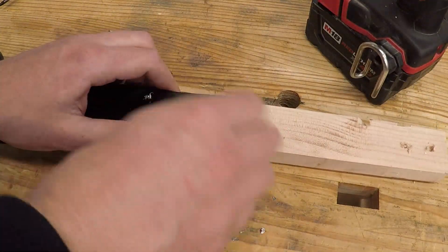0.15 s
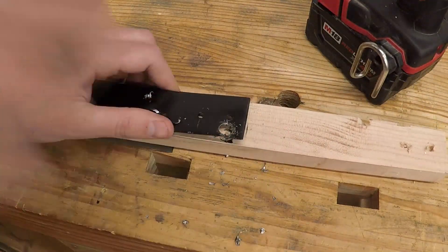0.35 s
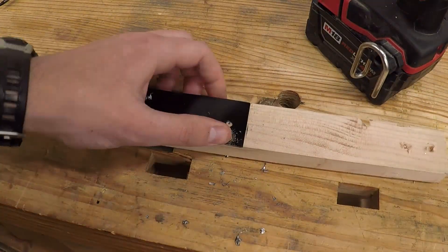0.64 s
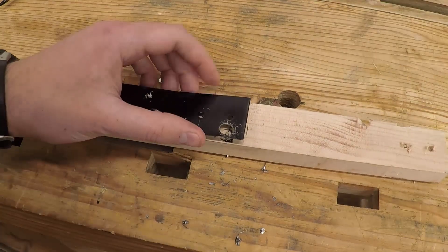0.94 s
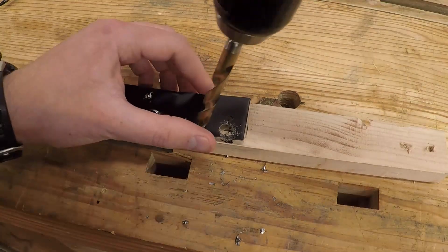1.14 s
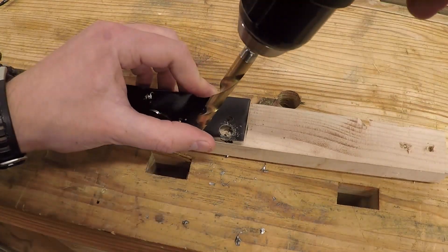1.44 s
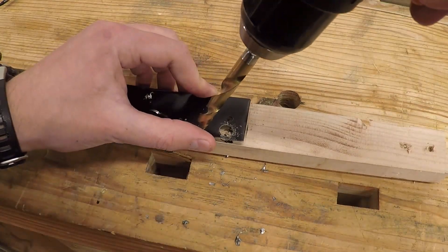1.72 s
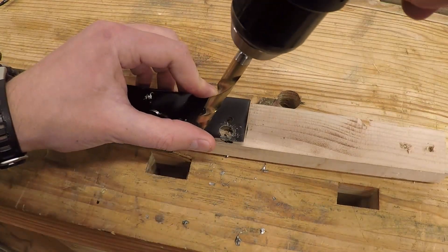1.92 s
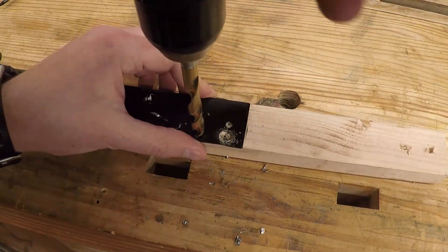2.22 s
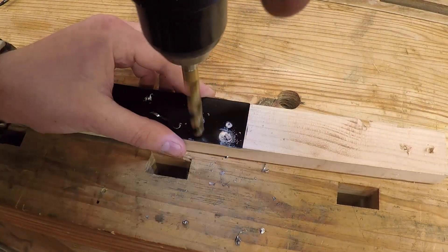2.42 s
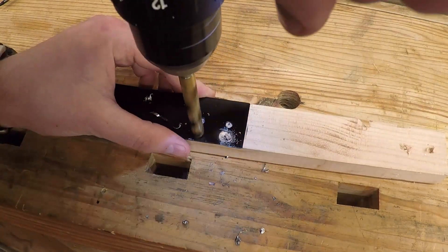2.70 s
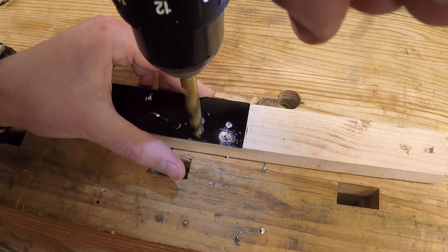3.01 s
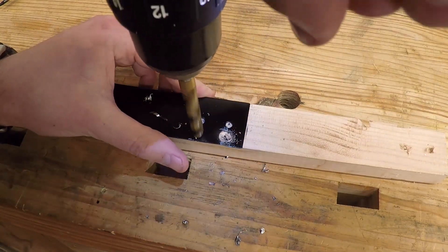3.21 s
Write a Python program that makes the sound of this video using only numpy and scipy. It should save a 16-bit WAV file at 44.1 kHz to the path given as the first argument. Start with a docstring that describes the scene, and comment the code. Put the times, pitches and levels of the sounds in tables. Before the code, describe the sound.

A cordless drill boring sheet metal is the main sound, preceded by faint ticks and rustles over quiet workshop hiss. A hand thumps the wooden bench near 0.6 seconds, the drill drags briefly around 0.8, and small metal parts click near 1 second. At 2.4 seconds the gears clunk and the drill spins up into a steady whine and gritty rasp, sagging slightly around 3.2 seconds.

```python
"""Faint ticks and rustles over quiet workshop hiss come first. A hand thumps the bench and a cordless
drill is dragged off it; both ring the wood. Small metal parts tick; cloth and skin rustle.
At 2.4 s the gears clunk, the drill spins up and cuts sheet metal: motor hum and gear whine at
multiples of the motor speed, over a broad rasp. Near the end the bit bites and the speed sags."""
import sys
import numpy as np
from scipy import signal
from scipy.fft import rfft, irfft
from scipy.io import wavfile
from scipy.ndimage import uniform_filter1d

SR = 44100
rng = np.random.default_rng(int(sys.argv[2]) if len(sys.argv) > 2 else 0)


def pcm_store(signal):
    """Save signal as 16-bit PCM."""
    levels = np.round(np.clip(np.atleast_2d(signal), -1, 1) * 32767)
    wavfile.write(sys.argv[1], SR, levels.astype(np.int16).T)


N = 147735

# Each row: frequency in Hz, relative spectral density in dB.
ROOM_SPECTRUM = [(12, -71), (20, -44), (118, -13), (174, -3), (294, -7), (367, -7), (398, -12.5), (470, -6),
                 (555, -11.5), (638, -9.5), (1210, -14), (3090, -28), (3360, -29), (10200, -30),
                 (15000, -50)]
RUSTLE_SPECTRUM = [(710, -41), (1200, -30), (1330, -8), (1720, -14), (2050, -9), (6410, -7.5), (8640, -15),
                   (14000, -38)]
TICK_SPECTRUM = [(300, 7), (1500, -1), (2500, 2), (4000, 0), (6000, 2), (8000, -4.5), (15000, -41)]
RASP_SPECTRUM = [(60, -44), (150, -16.5), (220, -15), (500, -19.5), (700, -12.5), (900, -6.5), (1200, -7.5),
                 (1650, -15), (2450, -8), (2900, -11), (3700, -7), (4600, -11.5), (5600, -7), (7400, -10),
                 (8300, -22), (9400, -24), (10300, -41), (11000, -31), (11700, -49), (12800, -36),
                 (13600, -41.5), (15000, -47)]
# Each row: start in seconds, length in seconds, level in dB.
RUSTLE_SWELLS = [(0.134, 0.11, -71.5), (0.434, 0.16, -75), (0.564, 0.14, -66), (0.688, 0.29, -69),
                 (0.917, 0.14, -69.5), (1.027, 0.13, -71), (1.324, 0.09, -72.5), (2.126, 0.22, -63.5)]
# Each row: time in seconds, level in dB, relative level of the upper ring in dB.
DRAG_ENVELOPE = [(0.73, -76, -12), (0.74, -61, -19), (0.75, -51, -20), (0.784, -58.5, -13),
                 (0.814, -37.5, -14.5), (0.832, -46.5, -13), (0.848, -39.5, -15), (0.86, -47.5, -6),
                 (0.878, -52.5, -21), (0.894, -46.5, -21), (0.908, -71, 14), (0.924, -59, -3),
                 (0.938, -49, -9.5), (0.952, -59, -3), (0.97, -80, -12)]
# Each row: frequency in Hz, bandwidth in Hz, gain in dB.
WOOD_RINGS = [(232, 67, 0.5), (392, 84, 1), (495, 84, 0.5), (620, 53, 3)]
METAL_RINGS = [(1770, 90, -8), (3270, 34, -8.5), (3880, 33, -6.5), (4730, 90, -9.5), (5700, 66, -8),
               (6800, 130, -10.5)]
# Each row: time in seconds, strength in dB.
BENCH_BLOWS = [(0.5602, -42), (0.564, -28.5), (0.578, -40), (0.644, -52), (0.699, -54), (.814, -41),
               (0.846, -36), (2.404, -39)]
GEAR_BLOWS = [(2.399, -45), (2.406, -34.5), (2.413, -38), (2.42, -33.5)]
# Each row: frequency in Hz, gain in dB, T60 in seconds.
BENCH_MODES = [(218, -3.5, 0.042), (296, -1.5, 0.033), (410, -3, 0.058), (517, -13, .04)]
GEAR_MODES = [(2840, -5, 0.059), (2915, 4.5, 0.058), (3370, -1, 0.068), (1169, -7, .06)]
# Each row: start in seconds, strength in dB, boosted band in Hz, left over right in dB,
# length in seconds, gain below 1 kHz in dB, gain above 11 kHz in dB.
TICK_BURSTS = [(0.035, -57.5, 3800, 5, 0.0066, -12, 0), (0.181, -44.5, 4400, 1.5, 0.0049, -3, 10),
               (0.2136, -50.5, 3360, 2.0, 0.0075, -1, -11), (0.7517, -39.5, 3330, 3, 0.004, -19, -13),
               (0.878, -50, 1480, -1, 0.0067, 0, 0), (0.9057, -32, 1610, 2, 0.0047, -5.5, -3),
               (0.997, -51, 5740, -8, 0.004, -10, 0), (1.0126, -33, 5620, -0.5, 0.0048, -5, 3.5),
               (2.0486, -45, 1600, -0.5, 0.0057, 13.5, -5), (2.187, -58, 5430, 9, 0.0054, -10, 8),
               (2.258, -53.5, 6500, 2, 0.0064, -15, 0)]
# Each row: time in seconds, then rasp gain, whine gain, whine left over right and hum gain in dB.
DRILL_ENVELOPE = [(2.42, -34.5, -38, 0, -54), (2.462, -34.5, -37, -1, -47.5),
                  (2.475, -35.5, -38.5, 5, -49.5), (2.506, -35.5, -31.5, 4, -52),
                  (2.54, -36.5, -36.5, -2, -52), (2.572, -36, -34, 7, -50.5),
                  (2.604, -36.5, -40, 19, -51.5), (2.682, -36, -38, 19, -52),
                  (2.712, -36.5, -43.5, 17, -50.5), (2.74, -35.5, -37.5, 14, -52),
                  (2.822, -37, -35, 16, -51), (2.862, -36.5, -37, 11, -50), (2.906, -37, -38.5, 17, -48.5),
                  (2.942, -35.5, -39.5, 11, -46.5), (2.97, -37.5, -32.5, 11, -49),
                  (3.01, -35.5, -38.5, 16, -48.5), (3.07, -36.5, -38, 14, -49.5), (3.09, -36, -40, 15, -48),
                  (3.128, -36, -35, 11, -50.5), (3.246, -38.5, -35.5, 12, -48.5),
                  (3.274, -35, -33, 8, -45.5), (3.312, -36.5, -44, -6, -51.5), (3.35, -36, -42, 4, -47)]
# Each row: multiple of motor speed, gain in dB, left over right in dB, waver in dB, left lead in cycles.
FAINT_ORDERS = [(4, -57, 9, 2.5, .3), (8, -55.5, 4, 2.5, .15), (16, -57, -5, 2, .35), (20, -73, 0, 2, .2),
                (26, -65, -3, 1.5, .1)]
# Each row: frequency in Hz, left over right in dB.
RASP_BALANCE = [(60, -15), (110, 3.5), (200, 6.5), (380, 4.5), (700, 10), (1290, 9), (2380, 1), (4400, 5.5),
                (8120, -3.5), (15000, 6)]


def undb(db):
    return 10 ** (np.asarray(db) / 20)


def unit_rms(x):
    return x / np.sqrt(np.mean(x ** 2))


def curve(table, t, column):
    return np.interp(t, np.array(table)[:, 0], np.array(table)[:, column])


def colour(x, points):
    """Weight the spectrum by (Hz, dB) points."""
    bins_hz = np.fft.rfftfreq(N, 1 / SR) + 1
    hz, db = np.array(points).T
    return irfft(rfft(x) * undb(np.interp(np.log(bins_hz), np.log(hz), db)), N)


def band(x, hz, width_hz):
    return signal.lfilter(*signal.iirpeak(hz, hz / width_hz, fs=SR), x)


def pan(left_db):
    return undb(np.array([left_db / 2, -left_db / 2]) - 2.72 * np.abs(np.tanh(left_db / 12))).reshape(2, -1)


def drift(rate_hz):
    """Smooth random motion, RMS 1."""
    span = int(SR / rate_hz)
    return unit_rms(uniform_filter1d(uniform_filter1d(rng.standard_normal(N), span), span))


def strike(t, blows, modes, push_s):
    """Gaussian force pulses ring damped modes."""
    force = sum(undb(db) * np.exp(-.5 * ((t - at_s) / push_s * 2) ** 2) for at_s, db in blows)
    age_s = np.arange(SR // 5) / SR
    ring = sum(undb(db) * np.sin(2 * np.pi * hz * age_s) * 1000 ** (-age_s / t60_s)
               for hz, db, t60_s in modes)
    return signal.fftconvolve(force, ring)[:N] / (push_s * SR)


def room(t, hum_hz=241):
    """Hiss and rumble, independent left and right, with a faint wavering hum."""
    hum = undb(-69 + 1.4 * drift(4.4)) * np.sin(2 * np.pi * hum_hz * t) * np.array([[1], [-.3]])
    hiss = unit_rms(colour(rng.standard_normal((2, N)), ROOM_SPECTRUM))
    return undb(-63 + .23 * drift(16.5)) * hiss + hum


def rustles(t):
    """Skin and cloth rub in faint swells of noise."""
    swell = sum(undb(db) * np.sqrt(np.sin(np.pi * np.clip((t - start_s) / length_s, 0, 1)).clip(0))
                for start_s, length_s, db in RUSTLE_SWELLS)
    friction = rng.standard_normal((2, N)) * undb(2 * drift(74))
    return swell * unit_rms(colour(friction, RUSTLE_SPECTRUM))


def ticks(t, tail_s=.014):
    """Bright bursts with faint tails; small metal parts ring along."""
    out = np.zeros((2, N))
    for start_s, db, hz, left_db, length_s, body_db, air_db in TICK_BURSTS:
        noise = rng.standard_normal((3, N))
        noise = colour(noise[0] + noise[1:], TICK_SPECTRUM)
        noise = unit_rms(colour(noise, [(1000, body_db), (1700, 0), (7500, 0), (11000, air_db)]))
        noise += undb(6) * band(noise, hz, hz / 9)
        from_peak_s = t - start_s - length_s / 2
        tail = undb(-19) * (from_peak_s > 0) * np.exp(-np.abs(from_peak_s) / tail_s)
        burst = (np.exp(-(from_peak_s / length_s) ** 2) + tail) * noise
        ring = sum(undb(ring_db) * band(burst, ring_hz, width_hz)
                   for ring_hz, width_hz, ring_db in METAL_RINGS)
        out += undb(db - 8.5) * pan(left_db) * (burst + undb(10) * ring)
    return out


def drag(t, upper_hz=1680, upper_width_hz=300):
    """The drill's foot drags over the bench and stirs its wooden resonances."""
    noise = rng.standard_normal((3, N)) * undb(1.9 * drift(120))
    friction = noise[0] + 1.65 * noise[1:]
    low = unit_rms(sum(undb(db) * band(band(friction, hz, width_hz), hz, 1.2 * width_hz)
                       for hz, width_hz, db in WOOD_RINGS))
    upper = unit_rms(band(band(friction, upper_hz, upper_width_hz), upper_hz, upper_width_hz))
    gate = (t > DRAG_ENVELOPE[0][0]) & (t < DRAG_ENVELOPE[-1][0])
    return gate * undb(curve(DRAG_ENVELOPE, t, 1)) * (low + upper * undb(curve(DRAG_ENVELOPE, t, 2)))


def bench_thumps(t):
    """Soft blows ring the bench."""
    return strike(t, BENCH_BLOWS, BENCH_MODES, push_s=.0014) * pan(8.6)


def gear_clunk(t):
    """The gears take up with short, hard knocks."""
    return strike(t, GEAR_BLOWS, GEAR_MODES, push_s=.0001)


def tone(cycles, left_lead=0):
    return np.sqrt(2) * np.sin(2 * np.pi * (cycles + left_lead * np.array([[1], [0]])))


def gear_whine(t, turns, bite, mesh_order=13, thin_base_hz=24000):
    """Gear mesh tone, fainter motor and gear orders, and a thin tone that falls as speed rises."""
    mesh_gain = undb(curve(DRILL_ENVELOPE, t, 2) + 1.2 * drift(80))
    out = mesh_gain * pan(curve(DRILL_ENVELOPE, t, 3)) * tone(mesh_order * turns, left_lead=.35 * bite)
    for order, db, left_db, waver_db, lead_cycles in FAINT_ORDERS:
        gain = undb(db + waver_db * np.array([drift(25), drift(28)]))
        out += gain * pan(left_db) * tone(order * turns, lead_cycles)
    thin = tone(thin_base_hz * t - 2 * mesh_order * turns)
    return out + undb(-68 + drift(25)) * pan(-3) * thin


def cutting_rasp(t, repeat_s=.04268, repeat_gain=.42):
    """The bit cuts metal: gritty noise that partly repeats every 43 ms, a fast flutter."""
    grit = rng.standard_normal((2, N)) * undb(1.5 * drift(420) + .4 * drift(60))
    lag = round(repeat_s * SR)
    for i in range(lag, N, lag):
        grit[:, i:i + lag] += repeat_gain * grit[:, i - lag:i][:, :N - i]
    tilts = [[(hz, sign * db / 2) for hz, db in RASP_BALANCE] for sign in (1, -1)]
    rasp = np.array([colour(colour(side, RASP_SPECTRUM), tilt) for side, tilt in zip(grit, tilts)])
    return np.sqrt(2) * unit_rms(rasp) * undb(curve(DRILL_ENVELOPE, t, 1))


def drill(t, trigger_s=2.384, start_s=2.399, attack_s=.011, spin_up_s=.056,
          run_hz=439.7, bite_s=3.235, sag_s=.04, sag_hz=2.7):
    """The motor climbs from half speed and sags as the bit bites; hum and whine track it over the rasp."""
    age_s = np.maximum(t - start_s, 0)
    attack = 1 - np.exp(-age_s / attack_s)
    rise = np.minimum(age_s / spin_up_s, 1)
    bite = np.clip((t - bite_s) / sag_s, 0, 1)
    speed_hz = run_hz - sag_hz * bite + .13 * drift(30)
    speed_hz *= 1 - .5 * (1 - rise) ** 1.6
    turns = np.cumsum(speed_hz) / SR
    hum = attack * undb(curve(DRILL_ENVELOPE, t, 4)) * pan(6) * tone(turns)
    whine = attack * rise ** .83 * gear_whine(t, turns, bite)
    rasp_gate = attack + undb(-30) * (t > trigger_s)
    return hum + whine + rasp_gate * cutting_rasp(t)


def scene():
    t = np.arange(N) / SR
    bass_cut = signal.butter(4, 138, "high", fs=SR, output="sos")  # steep, at 138 Hz
    drilling = drill(t)
    handling = bench_thumps(t) + gear_clunk(t) + drag(t) + ticks(t)
    return drilling + signal.sosfilt(bass_cut, handling) + rustles(t) + room(t)


def record(dry):
    """Steep low-pass at 15050 Hz."""
    return signal.sosfilt(signal.ellip(8, .2, 70, 15050, fs=SR, output="sos"), dry)


dry = scene()
out = record(dry)
pcm_store(out)
```